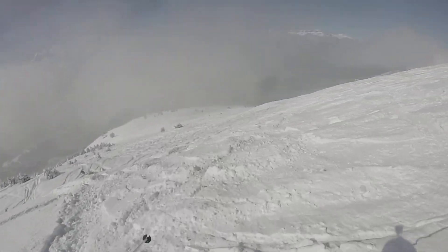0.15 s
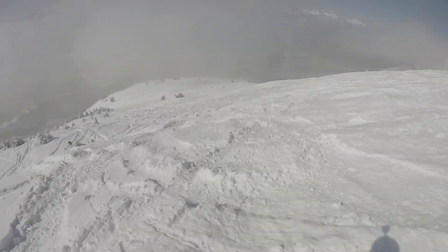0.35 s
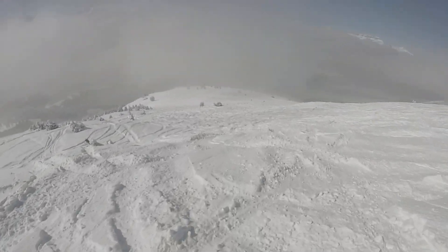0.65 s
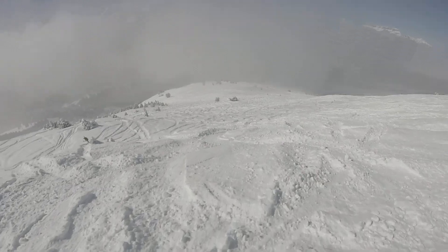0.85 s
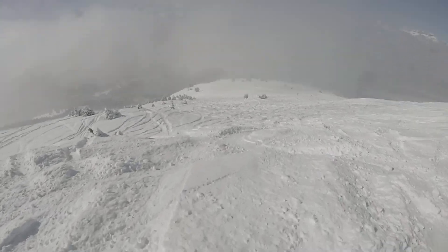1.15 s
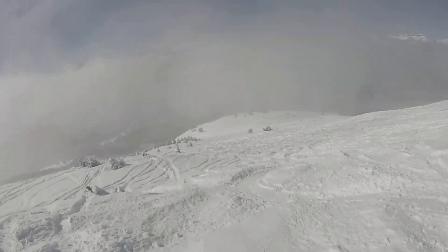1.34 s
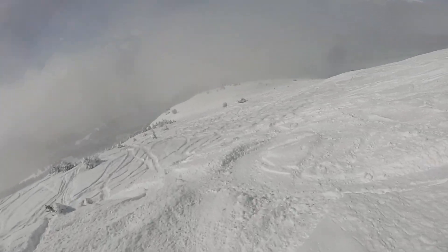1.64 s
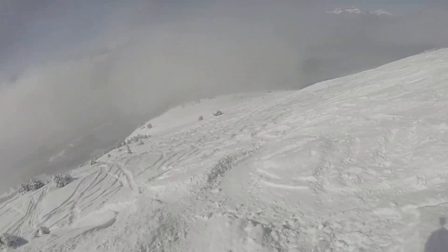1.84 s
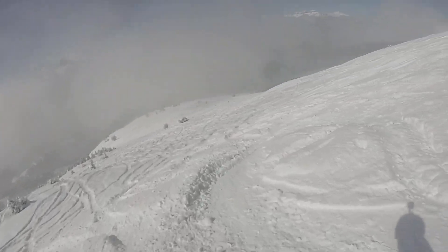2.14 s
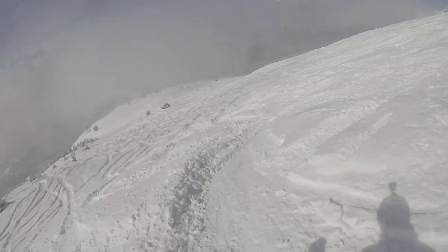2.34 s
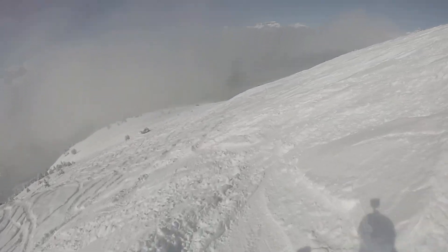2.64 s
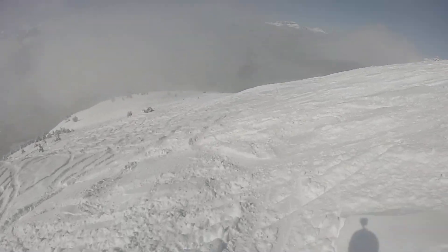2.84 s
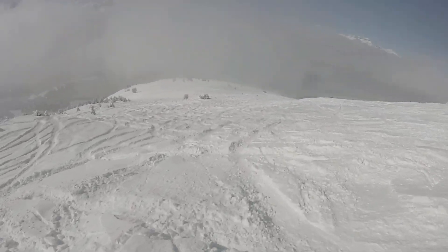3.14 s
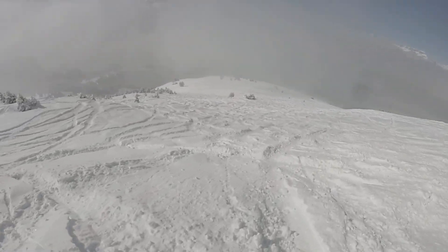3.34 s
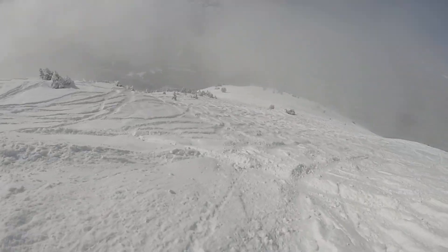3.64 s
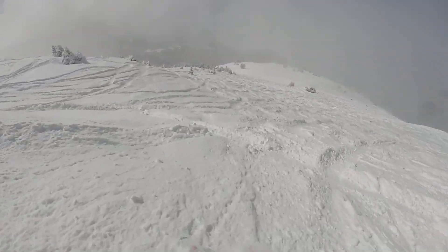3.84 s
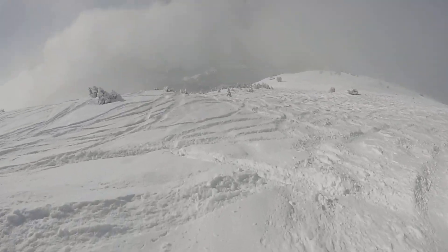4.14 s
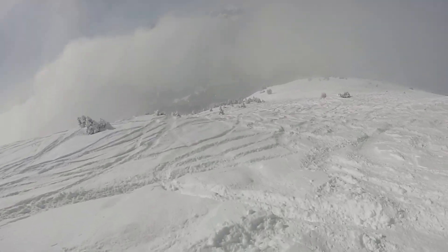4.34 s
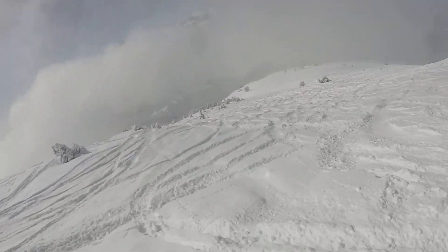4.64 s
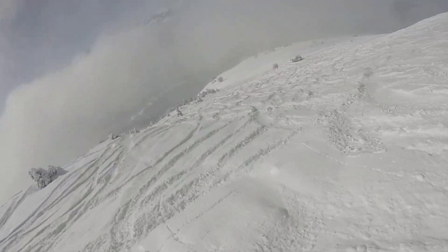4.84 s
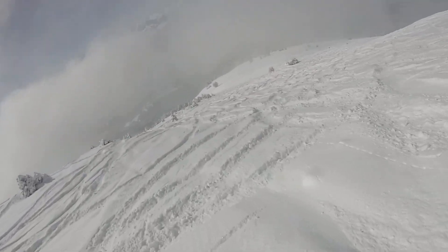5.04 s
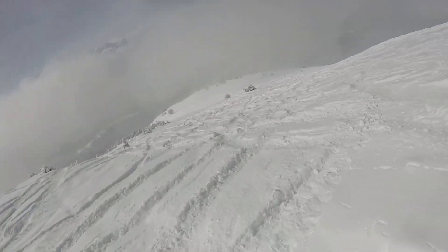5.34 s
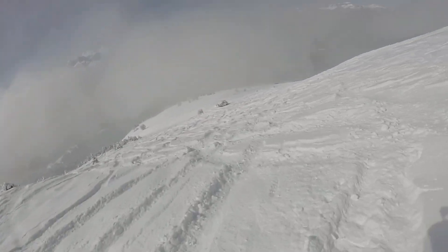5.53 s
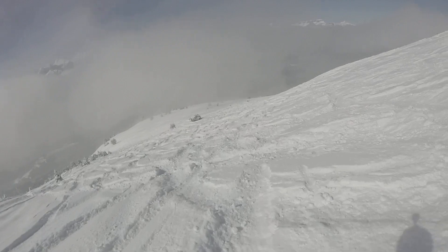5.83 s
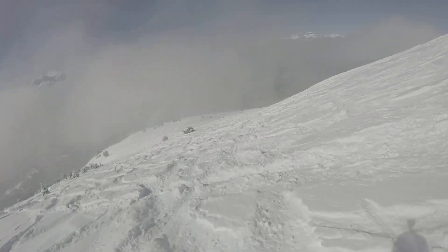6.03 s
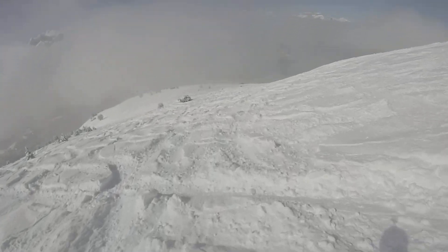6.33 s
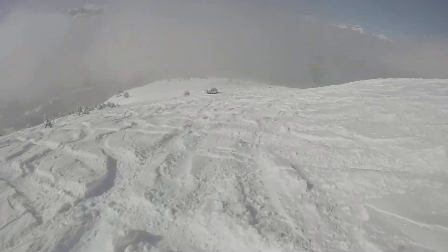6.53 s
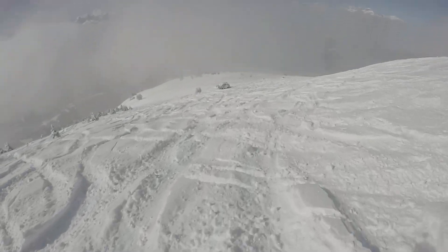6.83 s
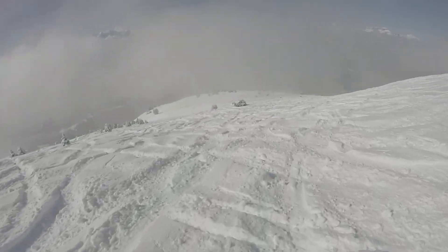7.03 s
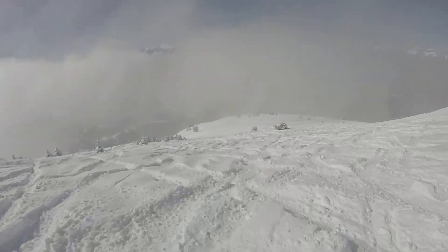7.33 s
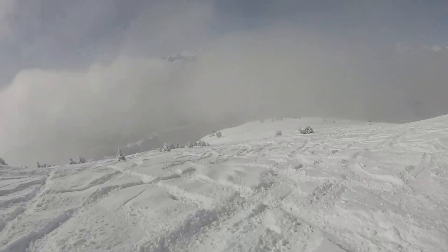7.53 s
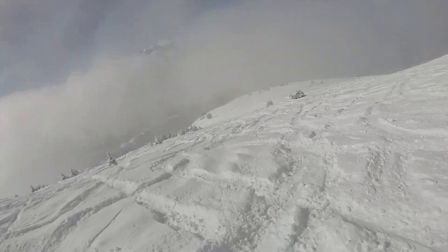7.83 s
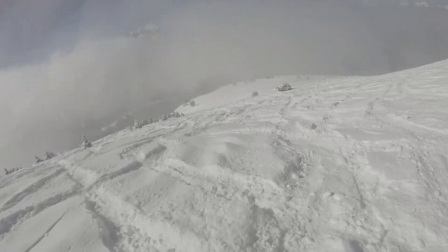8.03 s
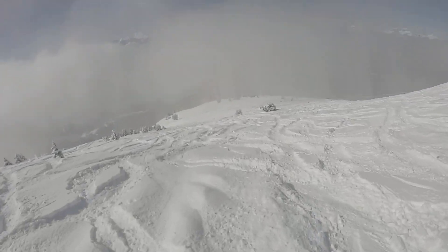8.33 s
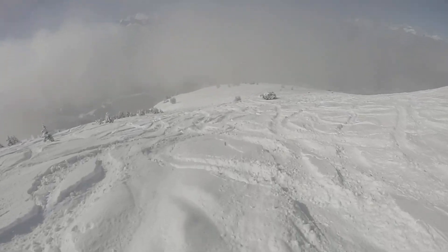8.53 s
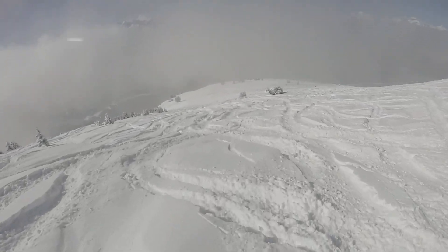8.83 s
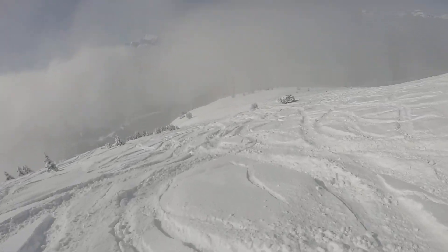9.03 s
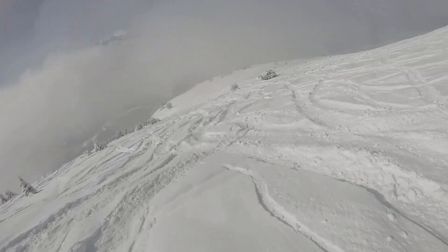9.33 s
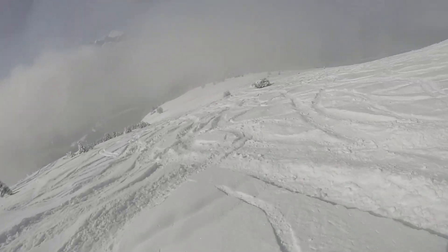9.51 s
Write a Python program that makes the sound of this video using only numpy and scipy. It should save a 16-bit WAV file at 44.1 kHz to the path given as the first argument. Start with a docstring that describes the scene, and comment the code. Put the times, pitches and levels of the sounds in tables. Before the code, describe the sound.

Skis hiss in quick swelling gusts through powder snow, heard inside a plastic housing with low wind rumble, rattling clicks and dull thumps.

```python
"""Ten seconds on skis in powder snow, from a small camera in a sealed plastic housing on the helmet.
From the start noise-made snow hiss comes through the housing's resonances over rumbling wind,
with clicks of a loose part and crystals ticking on the shell; jolts ring the mount, hard at 1.2 and 2.4 s.
A clack at 3.5 s leads into the hardest thump at 3.6 s, then brief squeaks of packed snow follow.
The hiss swells at 6 s, clicks crowd from 6.3 s, a hard thump falls at 8.1 s and hiss rises near the end."""
import sys
import numpy as np
from scipy import signal
from scipy.fft import rfft, irfft
from scipy.io import wavfile
from scipy.ndimage import uniform_filter1d

SR = 44100
rng = np.random.default_rng(int(sys.argv[2]) if len(sys.argv) > 2 else 0)


def attenuation_scalar(level_db):
    """Turn a level in dB into a linear amplitude multiplier (20 dB per decade)."""
    decades = np.asarray(level_db, float) / 20
    return 10 ** decades


def generate_wav(signal):
    """Clip the signal to [-1, 1] and save it as 16-bit WAV at the path in sys.argv[1]."""
    frames = np.transpose(np.atleast_2d(signal))
    scaled = np.clip(frames, -1, 1) * 32767
    pcm = np.round(scaled).astype(np.int16)
    wavfile.write(sys.argv[1], SR, pcm)


N = 426447

# gusts on the shell: start_s, buffeting level_db
GUST_CURVE = [(0.0, -38.5), (0.46, -33), (0.89, -35.5), (1.5, -41), (2.2, -40.5), (2.7, -30), (3.1, -42.5),
              (4.3, -40.5), (4.85, -40.5), (5.2, -34.5), (5.49, -38), (5.68, -28), (6.0, -38), (7.3, -34.5),
              (7.81, -38), (8.1, -34), (8.4, -38), (8.67, -40), (9.02, -38), (9.67, -42.5)]
# spectrum of the air rush, relative: pitch_hz, level_db (per Hz)
AIR_SPECTRUM = [(100, -1.5), (200, -4), (330, -6.5), (600, -11.5), (820, -8.5), (1250, -10.5),
                (1700, -10.5), (3000, -24.5), (6000, -52)]
# how hard the skis press into the snow, heard as the hiss: start_s, level_db
LOAD_CURVE = [(0.0, -42), (0.26, -37.5), (0.41, -62), (0.78, -38), (0.98, -49), (1.3, -57.5), (1.43, -46.5),
              (1.66, -40.5), (1.9, -45.5), (2.15, -38.5), (2.38, -48), (2.65, -40.5), (2.89, -52.5),
              (3.06, -49.5), (3.2, -43), (3.34, -42.5), (3.5, -55), (3.75, -69), (3.91, -47.5), (3.97, -73),
              (4.29, -60.5), (4.35, -52), (4.47, -45.5), (4.7, -44.5), (5.05, -39.5), (5.15, -44.5),
              (5.18, -50), (5.24, -47), (5.27, -46.5), (5.5, -39), (5.76, -44), (6.03, -34), (6.3, -42.5),
              (6.45, -53.5), (6.62, -51.5), (6.75, -43.5), (7.05, -48.5), (7.5, -60.5), (7.65, -49.5),
              (7.81, -39.5), (7.97, -46), (8.03, -56.5), (8.59, -52.5), (8.66, -47), (8.88, -45),
              (9.05, -58), (9.2, -47.5), (9.49, -36.5), (9.67, -53)]
# grain of the snow underfoot: start_s, lift_db (hiss below 2.6 kHz at the reference load)
GRAIN_CURVE = [(0.0, -0.5), (1.5, -3.5), (1.7, -7.5), (2.2, -7.5), (2.5, -0.5), (4.0, -3.5), (5.3, -1.5),
               (6.0, -2.5), (7.0, -2), (9.67, -3)]
# snow thrown into the air: start_s, level_db (spray at the reference load)
THROWN_CURVE = [(0.0, -58), (2.2, -58), (2.65, -51), (2.95, -53.5), (3.6, -53), (4.3, -55.5), (5.0, -52.5),
                (6.2, -54.5), (6.7, -59), (8.2, -56.5), (8.7, -59), (9.67, -54.5)]
# spectrum of the spray, relative: pitch_hz, level_db (per Hz)
SPRAY_SPECTRUM = [(1200, -9), (3000, 5.5), (5000, -2.5), (7000, -3.5), (8300, -11.5), (11000, -13.5),
                  (14800, -17), (15600, -40)]
# resonances of the plastic housing: pitch_hz, width_hz, level_db
HOUSING_MODES = [(1610, 186, -7), (2023, 96, 1), (2355, 218, -4), (3084, 152, 3), (3338, 205, 3),
                 (4340, 1110, -13.5), (4800, 267, -11.5), (5780, 170, -22.5), (6620, 210, -22.5)]
# short squeaks of packed snow: middle_s, length_s, pitch_hz, level_db (rms at the middle)
SQUEAK_EVENTS = [(4.382, 0.16, 810, -57.5), (4.367, 0.036, 3130, -45.5), (5.263, 0.037, 4460, -53),
                 (8.633, 0.019, 3220, -48.5), (8.975, 0.027, 3300, -45), (9.037, 0.16, 1620, -56.5)]
# dull low part of five of the ticks: start_s, level_db (before the band filter)
DULL_TICK_PARTS = [(0.425, -21.5), (2.512, -19), (2.8478, -31), (7.4146, -26.5), (8.14, -30)]
# snow crystals on the shell: start_s, top_db (relative level of the top end), body_db (above the top end)
TICK_EVENTS = [(0.4253, -41, 11), (0.8767, -37, 0.5), (1.037, -36, 2), (2.5101, -28, 3.5),
               (2.8478, -30.5, 4), (3.6264, -24.5, -2), (3.7614, -27, 1.5), (3.909, -40, 3),
               (4.5263, -34, 4.5), (4.6463, -35, 7), (4.7712, -38, 2), (5.0725, -41, 12), (5.7166, -43, -7),
               (6.8728, -31, 2), (6.9903, -21, -1), (7.1202, -21, -1), (7.4135, -43.5, 8),
               (7.9718, -35.5, -4), (8.1394, -40, 10.5), (8.2706, -39.5, 10.5), (8.962, -32, 0),
               (8.98, -36.5, 7.5), (9.1899, -38, 0), (9.409, -42, 17)]
# modes of the hard clack: pitch_hz, level_db, t60_s
CLACK_MODES = [(3330, -1.5, 0.008), (4720, -1, 0.0071), (5800, -6, 0.0095), (8900, -24, 0.0046)]
# loose part against the housing: start_s, level_db (relative)
CLICK_EVENTS = [(0.0854, -28.5), (0.4423, -24), (0.9867, -32), (1.1187, -27.5), (1.3262, -32.5),
                (2.2528, -29), (2.7252, -29.5), (2.901, -31.5), (3.7877, -34.5), (4.0734, -29.5),
                (4.819, -28), (5.4145, -32), (5.7355, -26), (5.8102, -27), (6.2868, -22.5), (6.4916, -20),
                (6.9159, -22.5), (7.0414, -30), (7.384, -23), (7.459, -20), (7.588, -26.5), (8.0818, -24),
                (8.34, -20.5), (9.093, -18)]
# modes of the loose part: pitch_hz, level_db, t60_s
PART_MODES = [(1670, -17, 0.018), (2040, -39, 0.0066), (2650, -9, 0.01), (2740, 7, 0.013),
              (3106, 2.5, 0.024), (4100, -5, 0.015), (4780, -3, 0.014), (5640, -38, 0.0074),
              (6430, -26, .008), (9550, 2.5, .004)]
# jolts of the mount: start_s, level_db (relative)
JOLTS = [(0.227, -28.5), (0.331, -38), (0.665, -33.5), (0.858, -39.5), (0.958, -25), (1.044, -22),
         (1.236, -10.5), (2.394, -10.5), (2.661, -21), (3.225, -40), (3.465, -26), (3.639, -1.5),
         (3.887, -9.5), (5.327, -37), (5.593, -28.5), (6.382, -21.5), (6.725, -37), (6.926, -33.5),
         (7.15, -25.5), (8.065, -24), (8.127, -11.5)]
# modes of the mount, the nod of the helmet first: pitch_hz, level_db, t60_s
MOUNT_MODES = [(42.2, -4.5, 0.12), (130.7, 2, 0.082)]
# modes of the shell under a hard jolt: pitch_hz, level_db, t60_s
KNOCK_MODES = [(880, -3, 0.033), (1054, -0.5, 0.031), (1428, 4.5, 0.011), (2070, -41, 0.004),
               (4300, -7, 0.015)]

REFERENCE_LOAD_DB = -40


def rms_one(x):
    """Scale to unit rms."""
    return x / np.sqrt(np.mean(x ** 2) + 1e-20)


def in_time(rows):
    """Columns of a curve table, one value per sample."""
    s, *columns = np.transpose(rows)
    return [np.interp(np.arange(N) / SR, s, c) for c in columns]


def drift(rate_hz):
    """Slow random wander of unit rms: low-passed noise, drawn every 40 samples."""
    r = np.exp(-80 * np.pi * rate_hz / SR)
    noise = rng.standard_normal(N // 40 + 2002)
    slow = signal.lfilter([1], [1, -2 * r, r * r], noise)[2000:]   # skip the run-in
    return np.interp(np.arange(N) / 40, np.arange(len(slow)), rms_one(slow))


def coloured(x, spectrum):
    """Shape a signal by (pitch_hz, level_db) points; rms 1."""
    hz, db = np.transpose(spectrum)
    log_hz = np.log(np.arange(N // 2 + 1) * SR / N + 1)
    gain = attenuation_scalar(np.interp(log_hz, np.log(hz), db))
    return rms_one(irfft(rfft(x) * gain, N))


def band(x, low_hz, high_hz):
    """Band-pass."""
    edges = [low_hz, min(high_hz, 0.45 * SR)]
    return signal.sosfilt(signal.butter(2, edges, "band", fs=SR, output="sos"), x)


def low_pass(x, hz):
    """Low-pass: a contact of finite length has little top end."""
    return signal.sosfilt(signal.butter(2, min(hz, 0.45 * SR), fs=SR, output="sos"), x)


def ring(force, modes):
    """A force sets every (pitch_hz, level_db, t60_s) mode ringing as a decaying sine."""
    out = 0
    for hz, level_db, t60_s in modes:
        r = attenuation_scalar(-60 / (t60_s * SR))
        w = 2 * np.pi * hz / SR
        mode = signal.lfilter([0, np.sin(w)], [1, -2 * r * np.cos(w), r * r], force + 1e-18)
        out = out + attenuation_scalar(level_db) * mode
    return out


def strikes(seconds, sizes):
    """Impulses of given sizes at given times."""
    out = np.zeros(N)
    out[np.round(np.asarray(seconds) * SR).astype(int)] = sizes
    return out


def grains(per_s, spread_db):
    """Random impulses, a few much larger than the rest."""
    sizes = attenuation_scalar(spread_db * np.minimum(rng.exponential(1, N), 4.0)) * rng.choice([-1, 1], N)
    return sizes * (rng.random(N) < per_s / SR)


def puff(impulses, rise_s):
    """Each impulse becomes a short burst of noise that rises and dies."""
    r = np.exp(-1 / (rise_s * SR))
    shape = signal.lfilter([np.e * (1 - r)], [1, -2 * r, r * r], np.abs(impulses) + 1e-18)
    return shape * rng.standard_normal(N)


def housing(x, coarse_db, patchy_db):
    """Sound passes the resonances of the shell, neighbours in opposite phase, each fed unevenly."""
    out = 0
    for k, (hz, width_hz, level_db) in enumerate(HOUSING_MODES):
        r = np.exp(-np.pi * width_hz / SR)
        b = (1 - r * r) / 2 * np.array([1, 0, -1])
        a = [1, -2 * r * np.cos(2 * np.pi * hz / SR), r * r]
        gain = attenuation_scalar(level_db + coarse_db * (hz < 2600) + patchy_db * drift(11.0))
        out = out + (-1) ** k * gain * signal.lfilter(b, a, x)
    return out


def wind(buffet_db, load_db):
    """Lumpy pressure on the shell, a tremble of the mount and a thin air rush; jolts stir the first two."""
    shake_s, shake_db, shake_follows = 0.091, -23.5, 0.78   # half width, level, share of the jolt's dB
    rest_db, after_db, after_t60_s = -55.5, -35.5, 1   # tremble at rest; after a jolt, relative to it; decay
    rush_db, load_follows = -53.5, 0.11   # level at the reference load; share of the load's swing
    swing_db = load_db - REFERENCE_LOAD_DB

    # power that each jolt adds, worked out every 100 samples
    s, jolt_db = np.transpose(JOLTS)
    jolt_db = jolt_db[:, None]
    t = np.arange(0, N, 100) / SR - s[:, None]
    shake = np.sum(attenuation_scalar(2 * (shake_db + shake_follows * jolt_db)) * np.exp(-(t / shake_s) ** 2), axis=0)
    decay_db = after_db + jolt_db - 60 * np.abs(t) / after_t60_s
    after = np.sum(attenuation_scalar(2 * decay_db) * (t > 0), axis=0)
    shake, after = (np.repeat(power, 100)[:N] for power in (shake, after))

    sway = rms_one(band(rng.standard_normal(N), 5.0, 23.0))
    nod = rms_one(band(band(rng.standard_normal(N), 32.0, 52.0), 28.0, 55.0))   # of the helmet
    pressure = sway + 0.55 * nod
    even = pressure / np.sqrt(uniform_filter1d(pressure ** 2, size=7000) + 1e-12)
    rumble = even * attenuation_scalar(2.0 * drift(8.2))   # lumpy again
    tremble = rms_one(ring(band(rng.standard_normal(N), 73.0, 216.0), MOUNT_MODES[1:]))
    tremble = tremble * attenuation_scalar(2.3 * drift(9.4))
    rush = coloured(rng.standard_normal(N), AIR_SPECTRUM) * attenuation_scalar(1.46 * drift(14.5))

    rumble_gain = np.sqrt(attenuation_scalar(2 * buffet_db) + shake)
    tremble_gain = np.sqrt(attenuation_scalar(2 * (rest_db + load_follows * swing_db)) + after)
    rush_gain = attenuation_scalar(rush_db + load_follows * swing_db)
    return rumble_gain * rumble + tremble_gain * tremble + rush_gain * rush


def squeaks():
    """Packed snow squeaks: noise in a narrow resonance that swells and fades."""
    t, out = np.arange(N) / SR, 0
    for middle_s, length_s, hz, level_db in SQUEAK_EVENTS:
        tone = rms_one(band(rng.standard_normal(N), hz * 0.93, hz * 1.07))
        out = out + attenuation_scalar(level_db) * tone * np.exp(-(2 * (t - middle_s) / length_s) ** 2)
    return out


def dull_tick_parts():
    """The dull low part of five of the ticks: a short knock of noise at 1.3-3.6 kHz."""
    s, level_db = np.transpose(DULL_TICK_PARTS)
    return band(puff(strikes(s, attenuation_scalar(level_db)), 0.00074), 1300.0, 3560.0)


def ticks():
    """Larger crystals strike the shell: brief noise gives a thin top end and a body rung by the shell."""
    s, top_db, body_db = np.transpose(TICK_EVENTS)
    top = puff(strikes(s, attenuation_scalar(top_db)), 0.0007)
    top = band(band(top, 12600.0, 15000.0), 9000.0, 16000.0)
    sharp = puff(strikes(s, attenuation_scalar(top_db + body_db)), 0.00052)
    for _ in range(3):   # hard contact favours high modes
        sharp = np.gradient(sharp)
    body = low_pass(housing(sharp, coarse_db=6.0, patchy_db=0.5), 9700.0)
    return attenuation_scalar(-6.0) * top + attenuation_scalar(26.0) * body


def clack():
    """A hard double touch with a little grit, perhaps a lump of ice on the shell, rings bright modes."""
    start_s, level_db = 3.5452, -20.5
    second_s, second_db = 0.00152, 1.5   # after and above the first touch
    hit = strikes([start_s, start_s + second_s], attenuation_scalar([level_db, level_db + second_db]))
    grit = np.gradient(puff(hit, 0.00071))
    return ring(band(hit, 2200.0, 11000.0) + 0.14 * grit, CLACK_MODES)


def clicks():
    """The loose part touches, then lands harder a millisecond later; each hit feeds the modes differently."""
    s, level_db = np.transpose(CLICK_EVENTS)
    chance_db = rng.normal(0, 1.2, (len(s), len(PART_MODES)))
    out = 0
    for k, mode in enumerate(PART_MODES):
        size = attenuation_scalar(level_db + chance_db[:, k])
        force = -0.6 * strikes(s, size) - 0.8 * strikes(s + 0.00108, size)
        out = out + ring(force, [mode])
    return attenuation_scalar(-9.0) * band(out, 1310.0, 4960.0)


def thumps():
    """A push and rebound of a few ms rings the mount, the slow helmet nod lagging; hard jolts knock the shell."""
    s, level_db = np.transpose(JOLTS)
    turn = np.arange(round(0.01057 * SR)) / (0.0091 * SR)
    push = -np.sin(2 * np.pi * turn) * np.sin(np.pi * turn) / len(turn)
    late_push = np.convolve(strikes(s + 0.0048, attenuation_scalar(level_db)), push)[:N]
    nod = -ring(late_push, MOUNT_MODES[:1])
    thud = ring(np.convolve(strikes(s, attenuation_scalar(level_db)), push)[:N], MOUNT_MODES[1:])
    hard = attenuation_scalar(1.28 * level_db - 24.5)   # the knock grows faster than the jolt
    second = low_pass(0.73 * strikes(s + 0.00634, hard), 2700.0)
    knocks = strikes(s + 0.00129, hard) + second
    crunch = band(puff(strikes(s + 0.0029, hard), 0.0083), 700.0, 2200.0)   # padding creaks as it settles
    return attenuation_scalar(12.5) * (nod + thud) + ring(low_pass(knocks, 4300.0), KNOCK_MODES) + 0.41 * crunch


def snow(load_db, grain_db, thrown_db):
    """Crystals crushed under the skis hiss in quick gusts; thrown snow patters on the shell in clumps."""
    coarse_per_db = -0.45   # light load sounds coarser: lift below 2.6 kHz per dB of load
    spray_follows = 0.16   # share of the load's swing
    swing_db = load_db - REFERENCE_LOAD_DB
    gusts = attenuation_scalar(1.6 * drift(16.8) + 0.46 * drift(65.0))
    crush = rng.standard_normal(N) + 0.3 * rms_one(grains(1500.0, spread_db=5.5))
    hiss = rms_one(housing(crush * gusts, grain_db + coarse_per_db * swing_db, patchy_db=0.5))
    per_s = 70.0 * attenuation_scalar(4.5 * drift(5.0))   # clumps
    large, small = (rms_one(puff(grains(per_s, spread_db=2.5), 0.00034)) for _ in range(2))
    patter = rng.standard_normal(N) * gusts
    patter = patter + 1.33 * low_pass(large, 11800.0) + 1.48 * band(small, 7900.0, 16600.0)
    spray = coloured(patter, SPRAY_SPECTRUM)
    return attenuation_scalar(load_db) * hiss + attenuation_scalar(thrown_db + spray_follows * swing_db) * spray


def through_shell(outside):
    """Sound from outside loses its top through the shell, 30 dB down from 15.6 kHz."""
    return signal.sosfilt(signal.cheby2(10, 30, 15600, fs=SR, output="sos"), outside)


def scene():
    """All sources reach one microphone inside the housing."""
    curves = (LOAD_CURVE, GRAIN_CURVE, THROWN_CURVE, GUST_CURVE)
    load_db, grain_db, thrown_db, buffet_db = (in_time(rows)[0] for rows in curves)
    outside = through_shell(snow(load_db, grain_db, thrown_db) + squeaks())
    on_shell = ticks() + dull_tick_parts() + clack()
    mix = wind(buffet_db, load_db) + thumps() + clicks() + on_shell + outside
    return mix[None]   # one channel


def top_cut(x):
    """Nothing passes above the cut-off."""
    return signal.sosfilt(signal.butter(12, 16510, fs=SR, output="sos"), x)


def record(dry):
    """The microphone signal is clipped at full scale, which the hardest jolt touches."""
    mix = np.clip(dry, -1, 1)
    return top_cut(mix)


dry = scene()
out = record(dry)
generate_wav(out)
```